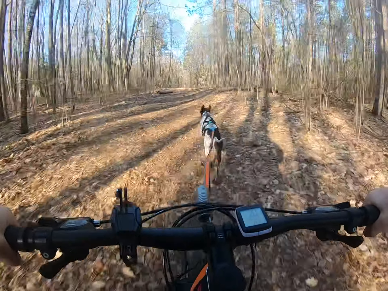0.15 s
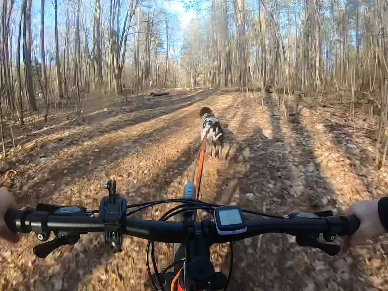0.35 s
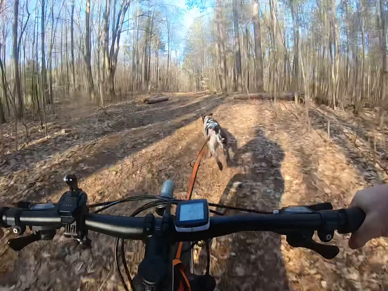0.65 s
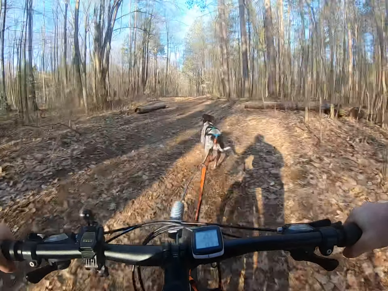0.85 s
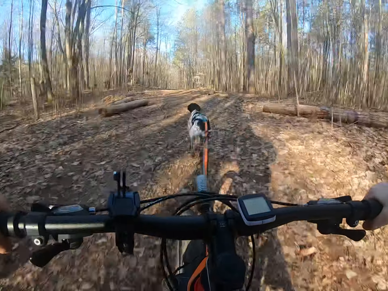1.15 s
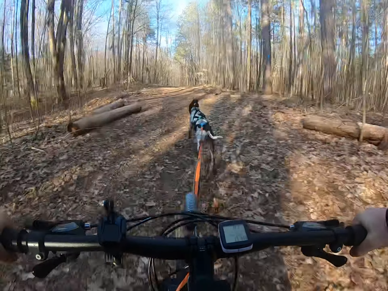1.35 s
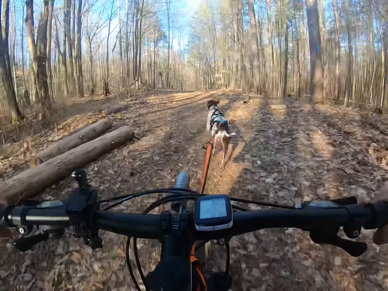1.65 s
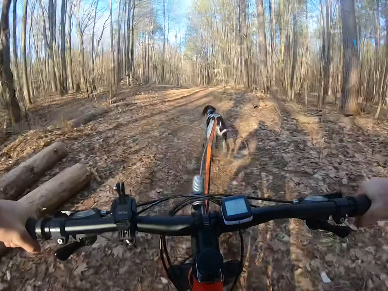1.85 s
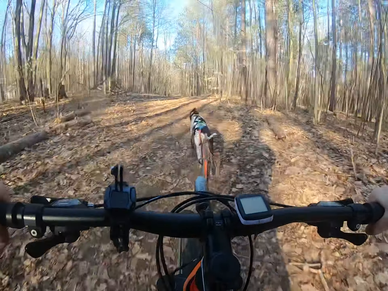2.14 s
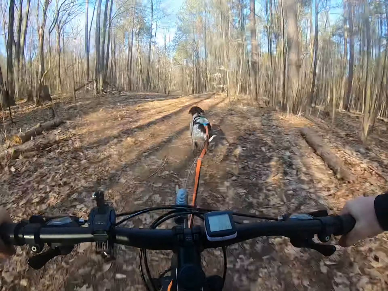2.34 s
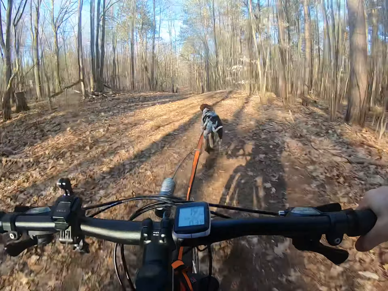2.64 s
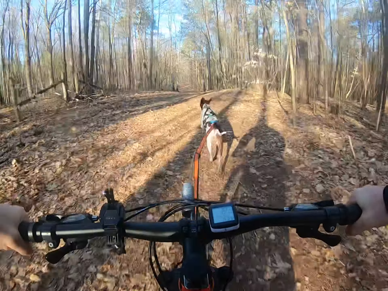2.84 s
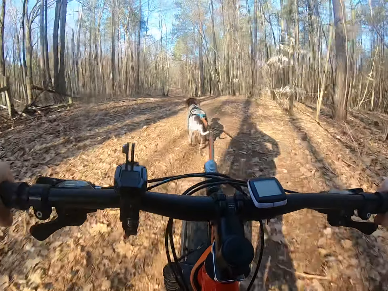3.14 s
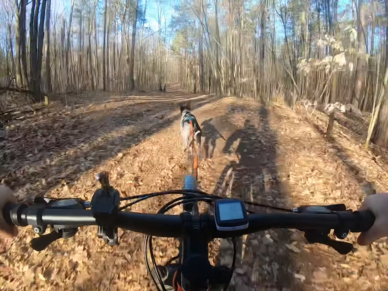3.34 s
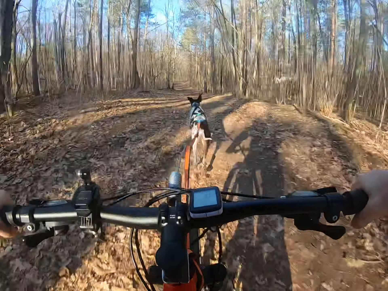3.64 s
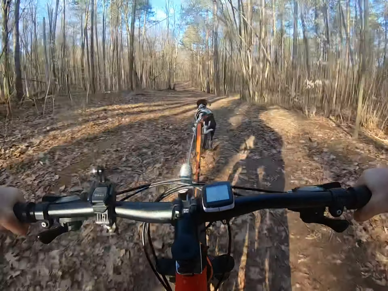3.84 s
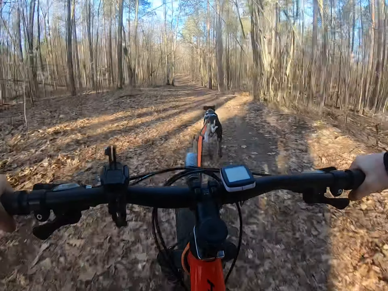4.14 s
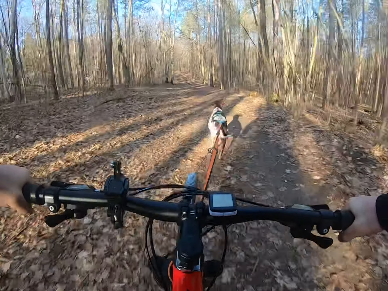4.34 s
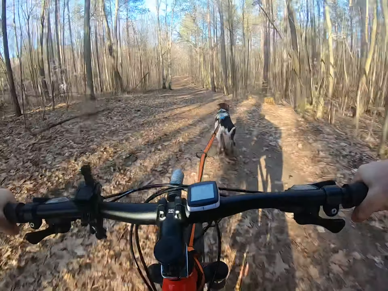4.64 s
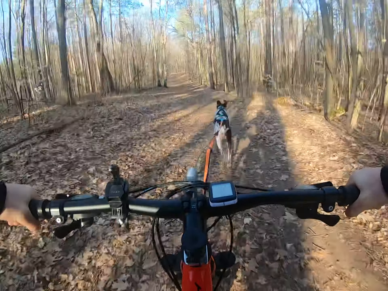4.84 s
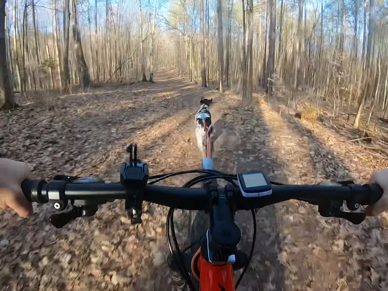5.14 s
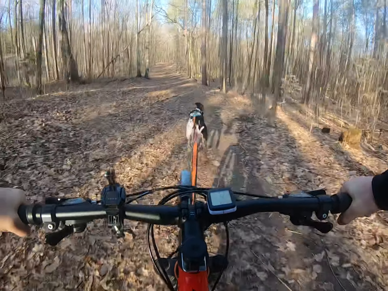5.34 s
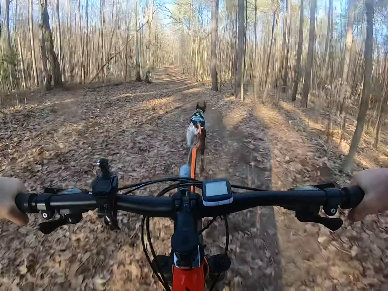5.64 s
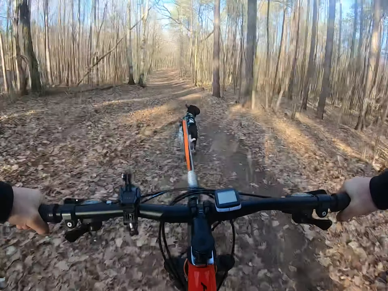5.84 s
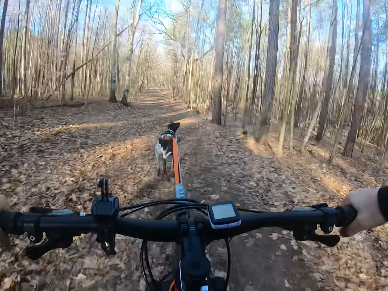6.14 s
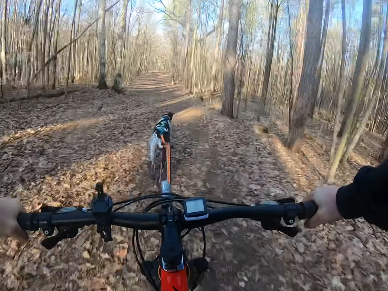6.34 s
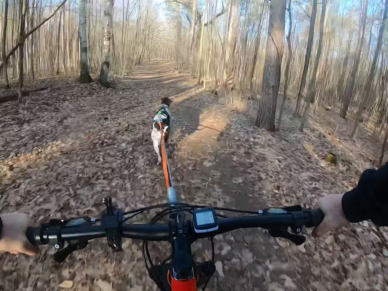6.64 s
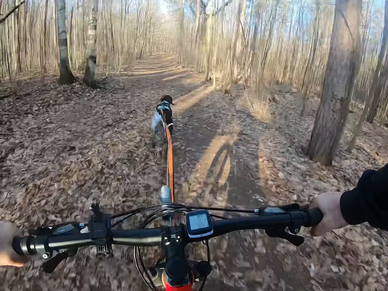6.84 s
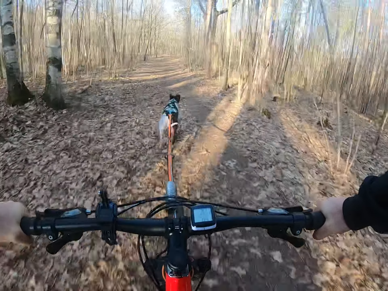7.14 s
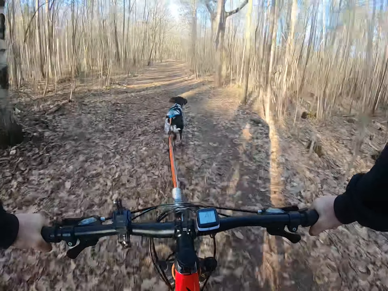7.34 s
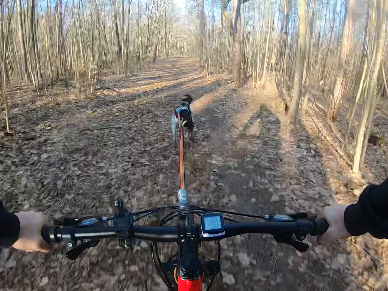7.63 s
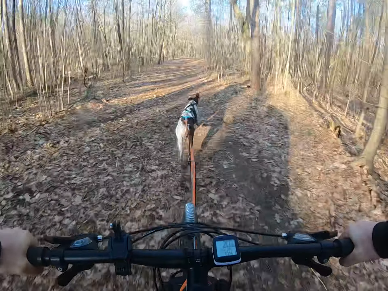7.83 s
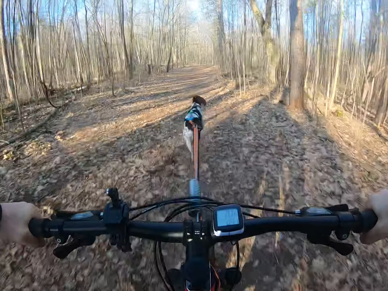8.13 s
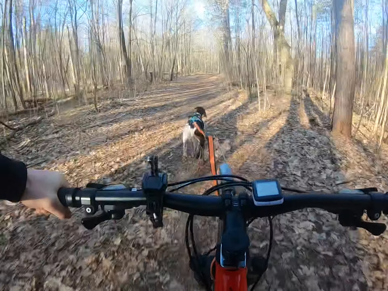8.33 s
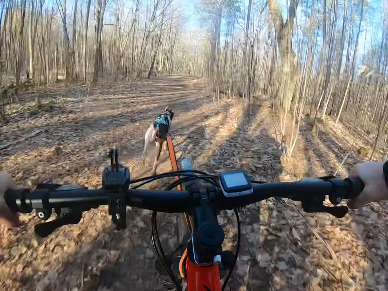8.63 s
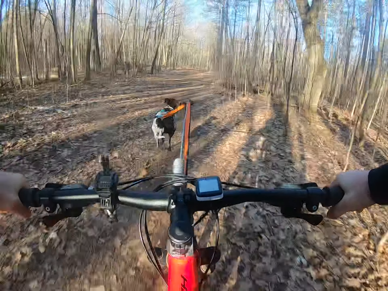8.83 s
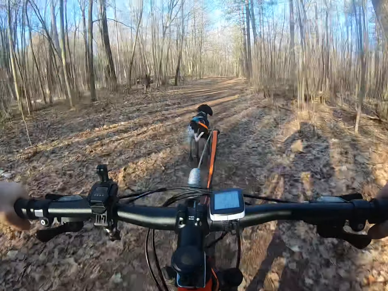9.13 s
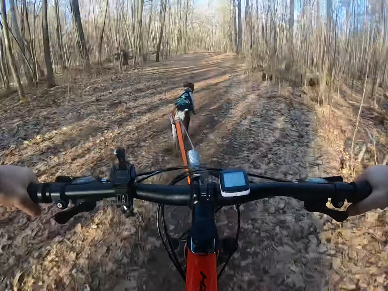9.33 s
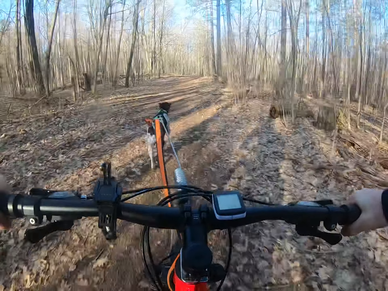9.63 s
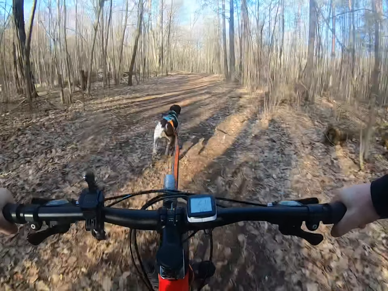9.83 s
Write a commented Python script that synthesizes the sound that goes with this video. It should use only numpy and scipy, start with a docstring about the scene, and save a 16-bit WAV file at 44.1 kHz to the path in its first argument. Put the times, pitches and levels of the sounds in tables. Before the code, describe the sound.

A mountain bike rolls steadily along a leafy forest trail, tyres crunching dry leaves over low rumble, with clicks and rattles increasing near the end.

```python
"""A leaf-covered forest trail, with a mountain bike rolling along it, heard from a camera on the rider.
Coloured noise makes the air rumble, frame drone and tyre hum; low damped tones make the jolts and root knocks.
The tyres crush dry leaves and grit: filtered showers of tiny fractures, with single crackles and scuffs on top.
Loose parts click and rattle as struck, damped modes, most of all over the rough ground near the end."""
import sys
import numpy as np
from scipy import signal
from scipy.fft import rfft, irfft, next_fast_len
from scipy.io import wavfile
from scipy.ndimage import uniform_filter1d

SR = 44100
rng = np.random.default_rng(int(sys.argv[2]) if len(sys.argv) > 2 else 0)


def digitize_waveform(pressure):
    """Quantize a signal to 16-bit integers and store it at the path in sys.argv[1].

    Rows of a 2-D input are taken as channels; values are limited to [-1, 1].
    """
    field = np.atleast_2d(pressure).T
    bounded = np.clip(field, -1, 1)
    quanta = np.round(bounded * 32767).astype(np.int16)
    wavfile.write(sys.argv[1], SR, quanta)


N = 440098
TIME = np.arange(N) / SR


def amp(db):
    """Amplitude factor of a level in dB."""
    return 10 ** (np.asarray(db) / 20)


def evened(x):
    """Scales each channel to unit RMS."""
    return x / np.sqrt(np.mean(x ** 2, axis=-1, keepdims=True) + 1e-20)


def unit_strike(x):
    """Scales a short sound to the energy of unit power over five milliseconds."""
    return x / np.sqrt(np.sum(x ** 2, axis=-1, keepdims=True) / (.005 * SR) + 1e-20)


def read(points, hz):
    """Reads a curve, straight lines on a log-frequency axis."""
    f, value = np.transpose(points)
    return np.interp(np.log(hz + 1), np.log(f + 1), value)


def add(mix, s, sound):
    """Lays a sound into the mix at s seconds, trimmed at the end."""
    part = mix[:, max(round(s * SR), 0):][:, :sound.shape[-1]]
    part += sound[..., :part.shape[-1]]


def colour(x, spectrum, size=2048):
    """Minimum-phase filter with the given spectrum: sharp attack, ringing afterwards."""
    log_gain = np.log(amp(read(spectrum, abs(np.fft.fftfreq(size, 1 / SR)))))
    taps = np.fft.ifft(np.exp(np.conj(signal.hilbert(log_gain)))).real[:size // 2]
    return signal.oaconvolve(x, taps[None], axes=1)[:, :x.shape[1]]


def resonate(x, hz, width_hz):
    """A resonance of gain 1 at its centre."""
    return signal.lfilter(*signal.iirpeak(hz, hz / width_hz, fs=SR), x)


def wander(rate_hz):
    """Random drift of unit RMS that changes at about the given rate."""
    steps = rng.standard_normal(8000)
    return evened(np.interp(TIME * 2 * rate_hz, np.arange(len(steps)), steps))


def crunch(per_s, spread_db, clump_db, clump_hz, wash):
    """Tiny fractures of uneven size, in clumps as each leaf gives way, over a wash of countless smaller ones."""
    happens = rng.random(N) < per_s / SR
    sizes = amp(spread_db * np.minimum(rng.exponential(1, N), 4)) * happens
    grains = evened(sizes * rng.choice([-1., 1.], (2, N)))
    return (grains + wash * rng.standard_normal((2, N))) * amp(clump_db * wander(clump_hz))


def flakes(low_hz, high_hz, per_s, sharpness, spread_db, count=24):
    """Overlapping tiny crackles, each ringing for a few cycles at the pitch of its own flake."""
    out = 0
    for hz in np.geomspace(low_hz, high_hz, count):
        left, size, right = rng.random((int(per_s * N / SR / count), 3)).T
        height = amp(spread_db * np.minimum(-np.log(1 - size), 3))
        breaks = np.zeros((2, N))
        breaks[0, (left * N).astype(int)] = height
        breaks[1, (right * N).astype(int)] = height
        out = out + resonate(breaks, hz, hz / sharpness)
    return evened(out) * np.sqrt(high_hz / (SR / 2))  # about as strong per Hz as white noise of unit power


def swells(rows, rise_s, fall_s):
    """Power over time of (start s, length s, dB) events that rise, hold and die away."""
    t, power = TIME[::50], 0
    for s, length, db in rows:
        rise = np.clip((t - s) / rise_s, 0, 1)
        fall = np.exp(-np.maximum(t - s - length, 0) / fall_s)
        power = power + (amp(db) * rise * fall) ** 2
    return np.interp(TIME, t, power)


# Roughness of the trail under the tyres. Each row: time in seconds, roughness in dB.
TRAIL = [(0, -8), (.8, -2), (1.15, -1.5), (1.35, -8), (1.6, -4), (1.9, -7.5), (2.4, -4.5), (3.15, -8),
         (3.5, -3.5), (3.85, 1.5), (4.25, -7), (5.0, -5.5), (5.5, -1), (6.2, 2.5), (6.65, 3), (7.3, 5.5),
         (8.1, -1), (8.8, 4.5), (9.3, 4), (9.8, 1)]
# Tyres pressing into humps and drifts of leaves. Each row: start in seconds, hold in seconds,
# then the push in dB for the leaves, for the soil and for the thud in the frame, before each layer's offset and trim.
BUMPS = [(0.0, 0.065, -56, -55, -39.5), (0.115, 0.048, -54, -53, -45), (0.237, 0.054, -48, -51, -47),
         (0.446, 0.097, -69, -50, -44), (0.587, 0.1, -47, -47.5, -40.5), (0.758, 0.021, -55, -40.5, -43),
         (0.805, 0.048, -53, -56, -42), (0.921, 0.061, -46, -46, -44), (1.043, 0.073, -47, -55, -54),
         (1.141, 0.081, -43.5, -42, -49), (1.543, 0.13, -48, -45, -45), (1.67, 0.13, -48, -48, -43.5),
         (1.832, 0.1, -46.5, -47.5, -42.5), (1.95, 0.038, -43, -46.5, -36), (2.03, 0.14, -45, -46.5, -43.5),
         (2.543, 0.078, -44.5, -48, -44), (2.62, 0.1, -44, -49, -43), (2.82, 0.044, -44.5, -48, -39.5),
         (3.038, 0.19, -45.5, -48.5, -48), (3.228, 0.12, -49, -56, -47), (3.552, 0.084, -46, -65, -60),
         (3.714, 0.076, -46.5, -55, -49), (3.804, 0.04, -48, -49, -52), (3.962, 0.021, -44, -50, -39),
         (4.118, 0.033, -51, -48, -52), (4.3, .04, -51, -54, -46), (4.586, 0.075, -46.5, -47, -43),
         (4.703, 0.079, -45, -46.5, -42), (4.82, 0.085, -46, -47, -42), (4.99, 0.096, -54, -60, -44.5),
         (5.114, 0.049, -43.5, -47, -44), (5.214, 0.024, -47, -45.5, -53), (5.366, 0.057, -64, -62, -54),
         (5.564, 0.05, -46, -45.5, -45), (5.84, 0.041, -45, -53, -45), (6.035, 0.087, -46, -43.5, -41),
         (6.48, 0.046, -62, -45.5, -45), (6.712, 0.12, -47.5, -49, -42.5), (6.83, 0.035, -46, -52, -52),
         (6.938, 0.086, -49, -53, -41), (7.075, 0.11, -45.5, -48, -37.5), (7.28, 0.17, -65, -67, -38.5),
         (7.426, 0.081, -51, -44.5, -39), (7.597, 0.14, -48.5, -48.5, -39), (7.724, 0.17, -48, -46.5, -38),
         (7.937, 0.032, -44, -51, -58), (8.115, 0.017, -56, -36, -49), (8.32, 0.081, -46, -42, -43),
         (8.604, 0.069, -47, -45.5, -56), (8.88, 0.033, -53, -56, -46), (9.07, 0.12, -44.5, -49, -39),
         (9.153, 0.17, -49, -52, -40), (9.31, 0.092, -44, -64, -61), (9.407, 0.066, -45, -47, -57),
         (9.54, 0.05, -41.5, -46, -37), (9.614, 0.022, -60, -62, -35), (9.933, 0.049, -52, -43, -36.5)]
LEAVES_COLUMN, SOIL_COLUMN, THUD_COLUMN = 2, 3, 4


def rolling_gain(law, column):
    """A layer follows the roughness of the trail and swells with one column of the bumps."""
    even_db, follow, bump_db = law
    steady = amp(even_db + follow * np.interp(TIME, *np.transpose(TRAIL)))
    pushes = [(row[0], row[1], row[column] + bump_db) for row in BUMPS]
    return np.sqrt(steady ** 2 + swells(pushes, rise_s=0.026, fall_s=0.017))


# Tone of the buffeting air. Each row: frequency in Hz, relative level in dB per Hz.
RUMBLE_SPECTRUM = [(5, -18), (15, -1.5), (25, 2), (40, -4), (65, -17), (100, -35), (250, -33.5),
                   (1000, -100)]
# The rider lurches and air buffets the camera. Each row: start in seconds, hold in seconds, level in dB.
LURCHES = [(.43, 0.056, -31), (.67, .2, -43.5), (.98, 0.074, -37), (1.17, 0.1, -34), (1.53, 0.089, -35),
           (1.72, 0.12, -31), (2.11, 0.051, -32), (2.29, 0.051, -34), (2.6, 0.19, -31.5), (3.09, 0.19, -39),
           (3.6, 0.048, -32.5), (3.77, 0.1, -37), (3.95, 0.22, -34), (4.31, 0.08, -31.5),
           (4.66, 0.037, -34), (5.0, 0.098, -33), (5.35, 0.21, -34.5), (5.73, 0.065, -30),
           (5.89, 0.15, -35.5), (6.41, 0.055, -31), (6.83, 0.15, -34.5), (7.13, 0.09, -31.5),
           (7.32, 0.16, -33), (7.63, 0.11, -31), (7.92, 0.4, -32), (8.48, 0.047, -30), (9.12, 0.095, -29.5),
           (9.36, 0.043, -30), (9.5, 0.14, -32.5)]


def buffeting():
    """Air rumbles at the microphone: deep noise, calm between lurches and swelling with each one."""
    rumble = evened(colour(rng.standard_normal((2, N)), RUMBLE_SPECTRUM, size=16384))
    rumble /= np.sqrt(uniform_filter1d(rumble ** 2, size=6000, axis=1) + 0.14)  # evens out its own surges
    calm = amp(-39.5 + 1 * wander(rate_hz=2.6))
    return rumble * np.sqrt(calm ** 2 + swells(LURCHES, rise_s=0.021, fall_s=0.015))


# Tone of the droning frame. Each row: frequency in Hz, relative level in dB per Hz.
DRONE_SPECTRUM = [(30, -36.5), (70, 4), (100, 0.5), (160, -1.5), (205, -5.5), (250, -16.5), (340, -19),
                  (460, -28), (900, -46.5), (3000, -110)]
# How the drone rides the trail: level at roughness 0 in dB before trim, dB per dB of roughness, bump offset in dB.
DRONE_LAW = (-45, 0.82, 0)


def frame_drone(trim_db=-2.0):
    """Bumps set the frame droning: low grainy noise that follows the trail."""
    grain = crunch(per_s=90, spread_db=2.5, clump_db=-0.5, clump_hz=29.05, wash=0.99)
    drone = evened(colour(grain, DRONE_SPECTRUM, size=8192))
    return amp(trim_db) * drone * rolling_gain(DRONE_LAW, THUD_COLUMN)


# Tone of the tyre hum. Each row: frequency in Hz, relative level in dB per Hz.
HUM_SPECTRUM = [(120, -27), (220, -7), (258, -4.5), (279, 1), (305, -7.5), (345, -16.5), (410, -18),
                (500, -20), (900, -38), (3000, -81)]
# How the hum rides the trail: level at roughness 0 in dB, dB per dB of roughness, bump offset in dB.
HUM_LAW = (-53.5, 0.37, -33)


def tyre_hum():
    """The knobbly tyres hum as they roll: grainy noise in a narrow low band."""
    grain = crunch(per_s=280, spread_db=4.0, clump_db=2.0, clump_hz=4.5, wash=1.08)
    return evened(colour(grain, HUM_SPECTRUM, size=8192)) * rolling_gain(HUM_LAW, THUD_COLUMN)


# Hard jolts taken by tyres and fork. Each row: start in seconds, level in dB before the attack, pitch in Hz.
JOLTS = [(.923, -37.5, 111), (1.752, -41, 46), (5.116, -31, 47.7), (5.358, -33, 74.4), (7.135, -39, 125),
         (7.622, -25, 49.7), (8.139, -29, 59), (9.116, -22, 42), (9.165, -19.5, 52.4), (9.627, -28, 45)]


def jolts(rise_s=0.005, t60=0.14):
    """The bike bounces on its tyres and fork: one low, damped tone for each thump."""
    out, t = np.zeros((2, N)), np.arange(SR // 4) / SR
    for s, db, hz in JOLTS:
        envelope = amp(db - 60 * t / t60) * (1 - np.exp(-t / rise_s))
        add(out, s, envelope * np.sin(2 * np.pi * hz * t))
    return out


# The frame, struck from below. Each row: mode in Hz, level in dB re the knock, t60 in seconds.
FRAME_MODES = [(292, -1.5, 0.074), (423, -4, 0.03), (790, -6, 0.022), (1400, -10, 0.016)]
# Roots knocking through the wheels. Each row: start in seconds, level in dB,
# hardness in dB per octave above the lowest mode.
ROOTS = [(1.8642, -30, 5), (2.66, -38, -9), (2.678, -28.5, -17), (2.721, -37, -18), (2.778, -42, -14)]


def roots():
    """A root gives the frame one compact knock; a hard one wakes the higher modes too."""
    out, t = np.zeros((2, N)), np.arange(SR // 5) / SR
    hz, mode_db, t60 = np.transpose(FRAME_MODES)[:, :, None]
    for s, db, hardness in ROOTS:
        strength_db = db + mode_db + hardness * np.log2(hz / hz[0])
        modes = amp(strength_db - 60 * t / t60) * np.sin(2 * np.pi * hz * t)
        add(out, s, modes.sum(0))
    return out


# Metal parts clinking. Each row: start in seconds, level in dB before each layer's offset,
# time to the rebound in seconds.
CLINKS = [(2.001, -35.5, 0.0039), (2.039, -29, 0.0046), (4.4688, -38.5, 0.0049), (7.316, -45.5, 0.005),
          (8.469, -32.5, 0.0027), (8.5276, -32, 0.0035), (9.121, -41, 0.0045), (9.2052, -37, 0.0018),
          (9.4234, -30, 0.0044)]
REBOUND_DB = -10.5  # re the first strike


def clink_strikes():
    """A clinking part strikes twice: (start s, dB) of every clink and its rebound."""
    first = [(s, db) for s, db, _ in CLINKS]
    return first + [(s + delay, db + REBOUND_DB) for s, db, delay in CLINKS]


def ring(modes, band_hz, t, force, detune=0.025):
    """Damped modes driven by the contact force, a little off pitch each time, kept to the part's band."""
    hz, db, t60 = np.transpose(modes)[:, :, None]
    hz = hz * (1 + detune * (2 * rng.random(hz.shape) - 1))
    wave = (amp(db - 60 * t / t60) * np.sin(2 * np.pi * hz * t)).sum(0)
    wave = signal.sosfilt(signal.butter(3, band_hz, "bandpass", fs=SR, output="sos"), wave)
    return unit_strike(signal.fftconvolve(force, wave[None], axes=1)[:, :len(t)])


# Ringing of the bike around a knock, then of a clinking part.
# Each row: nominal mode in Hz before detuning, relative level in dB, t60 in seconds.
KNOCK_MODES = [(910, -1, 0.009), (1700, -32, 0.0061), (1900, -3.5, 0.023), (2350, 5.5, 0.0054),
               (3130, -18, 0.019), (1720, -15, 0.084)]
CLINK_MODES = [(3020, -19, 0.00073), (3180, 28, 0.014), (3680, -17, 0.005)]
# Band in which each struck part radiates: low edge in Hz, high edge in Hz.
KNOCK_BAND = (1100, 4240)
CLINK_BAND = (2720, 4330)
# Dull knocks of loose parts. Each row: start in seconds, level in dB before trim, nominal pitch of the part in Hz,
# metallic edge in dB re that level, left minus right in dB.
KNOCKS = [(0.2166, -33, 2160, -11, -3), (0.779, -41.5, 1700, -20, 3), (1.6667, -31.5, 1850, -11, -3),
          (1.7268, -37, 2300, -5, -3), (3.1796, -34.5, 1900, -9, -3), (4.437, -36.5, 1970, -16, -1),
          (5.3052, -32.5, 1960, -18, -3), (5.346, -30, 2220, -12, -4), (5.647, -34, 1720, -12, -2),
          (6.2736, -33, 2100, -13, -2), (6.3103, -21, 2100, -8.5, -3), (6.8036, -32, 2200, -3, -5),
          (6.9975, -25.5, 1870, -15, -3), (7.2101, -28.5, 1580, -6, -6), (7.219, -35, 2100, -8, 5),
          (7.2625, -24.5, 2140, -13, 1), (7.279, -32, 2280, -4.5, -1), (8.2335, -23, 2200, -20, -1),
          (8.301, -33, 1890, -6, 2), (8.352, -32, 2400, -3.5, -2), (8.5286, -39, 2050, -14, -2),
          (8.8992, -35.5, 2200, -7, -1), (9.2052, -34.5, 2400, 2, -1), (9.2419, -25, 2240, -13, 0),
          (9.2569, -23, 2090, -24, -8), (9.2609, -22, 2100, -24, -1), (9.299, -23.5, 1910, -27, 0),
          (9.3085, -27, 2400, -5, 1), (9.361, -31, 1990, -6, -1), (9.388, -36, 1700, -5, 4),
          (9.411, -36, 2200, -14, 0), (9.428, -36, 1800, -2, -2), (9.4469, -38, 2300, -10, -3),
          (9.6212, -15, 2190, -32, 4.5), (9.638, -28.5, 2220, -17, -13)]


def rattles(knock_trim_db=-1.0, chatter=0.13, chatter_s=0.0033):
    """Each strike rings a dull part and a metallic one, which chatter briefly as they meet."""
    out, t = np.zeros((2, N)), np.arange(2400) / SR
    strikes = [(s, db, hz, db + edge, pan) for s, db, hz, edge, pan in KNOCKS]
    # a clink also strikes a dull part: 5 dB under it, at 2 kHz, 6 dB to the left
    strikes += [(s, db - 5, 2000, db, 6) for s, db in clink_strikes()]
    for s, knock_db, hz, clink_db, pan_db in strikes:
        force = (t == 0) + chatter * np.exp(-t / chatter_s) * rng.standard_normal((2, len(t)))
        own_note = (hz, 11.5, 0.0092)  # Hz, dB, t60 s
        dull = amp(knock_db + knock_trim_db) * ring([own_note] + list(KNOCK_MODES), KNOCK_BAND, t, force)
        metal = amp(clink_db) * ring(CLINK_MODES, CLINK_BAND, t, force)
        add(out, s, (dull + metal) * amp([[pan_db / 2], [-pan_db / 2]]))
    return out


# Tone of a hard contact, then of its bright tip. Each row: frequency in Hz, relative level in dB per Hz.
SNAP_SPECTRUM = [(800, -25), (2500, -10.5), (4200, -4), (5500, 2), (7000, -1), (8400, -1), (9500, -12.5),
                 (11000, -24), (14000, -55.5)]
TIP_SPECTRUM = [(5000, -27.5), (8500, 2.5), (9500, 1), (12500, -14.5), (14500, -19), (16500, -36)]
# Sharp ticks of grit and chain. Each row: start in seconds, level in dB, bright tip in dB re the tick before trim,
# first minus second channel in dB ahead of the ports.
TICKS = [(0.219, -41.5, -3, 0), (4.4368, -41, -25, -8), (5.3458, -50, -9, 0), (5.169, -40, -6, 0),
         (5.2036, -32, -2.5, -6), (5.8366, -31, -1.5, -7), (5.8765, -40, -3, 1), (6.2733, -32.5, -0.5, -4),
         (6.311, -34, -4, -1), (6.753, -37.5, -9, -4), (6.818, -43, -8, -3), (6.881, -42, -1.5, 2),
         (7.2101, -27.5, -5, -5), (7.2132, -31, 0, -4), (7.2185, -46, -12, -3), (7.2625, -41, -2, 0),
         (7.2655, -37, -3, 0), (7.279, -34.5, -7, -1), (7.3614, -41.5, -2.5, -6), (7.533, -39, -6, 4),
         (7.913, -41, -5, 1), (8.041, -39, -1.5, 0), (8.2338, -37, -9, -1), (8.3008, -36, -18, -11),
         (8.3524, -38, -24, -4), (8.528, -37, -22, -8), (9.0456, -37, -5, -2), (9.093, -39, -4, -5),
         (9.205, -44, 3, 0), (9.246, -28.5, -6, -6), (9.2608, -33, -8, -4), (9.2634, -30.5, -8, -5),
         (9.3088, -32.5, -0.5, -3), (9.3171, -33.5, 1, -2), (9.3434, -44, -15, -3), (9.3565, -41, -8, 0),
         (9.361, -33.5, -4, 5), (9.388, -35, -7, 2), (9.4012, -41, -14, 0), (9.4116, -37, -4, -2),
         (9.4234, -36, -8, -8), (9.4463, -33.5, -4, -13), (9.566, -41, -17, -2), (9.5835, -34.5, -2, -8),
         (9.6381, -32, -6, 3), (9.7074, -33.5, -6, -6), (9.8377, -44.5, -4, 1), (9.931, -34.5, -6, -6)]
# Rough ground flings grit against the bike. Each row: start in seconds, length in seconds,
# level of a grain in dB before its random size.
SPRAYS = [(7.197, 0.11, -43), (9.25, 0.2, -46)]


def snaps(tip_trim_db=-1.5, crack_s=0.0011, tail_s=0.01, tail=0.08, first_touch=2.8, grit_per_s=55):
    """The hard contact of each tick, clink and flung grain: one sharp spike, then a short scatter off the bike."""
    out, t = np.zeros((2, N)), np.arange(1200) / SR
    scatter = np.exp(-t / crack_s) + tail * np.exp(-t / tail_s)
    contacts = list(TICKS) + [(s, db + 1.5, -23, -5) for s, db in clink_strikes()]
    for s, length, db in SPRAYS:
        for when, size in rng.random((int(grit_per_s * length), 2)):
            contacts.append((s + length * when, db + 10 * np.log10(.5 + size), -6, 0))
    for s, snap_db, tip_db, pan_db in contacts:
        crack = first_touch * (t == 0) + scatter * rng.standard_normal((2, len(t)))
        sides = evened(amp([pan_db / 2, -pan_db / 2]))[:, None]
        snap = unit_strike(colour(crack, SNAP_SPECTRUM, size=512))
        tip = unit_strike(colour(crack, TIP_SPECTRUM, size=512))
        add(out, s, sides * amp(snap_db) * snap)
        add(out, s, sides * amp(snap_db + tip_db + tip_trim_db) * tip)
    return out


# Tyres scuffing over sticks and roots. Each row: start in seconds, level in dB before the attack,
# centre in Hz, width in Hz of each of two filter passes, t60 in seconds.
SCUFFS = [(1.186, -42, 1570, 1520, 0.59), (1.721, -41.5, 6060, 6000, 0.11), (1.856, -29, 1240, 1700, 0.07),
          (2.045, -32, 1090, 1100, 0.069), (2.656, -42.5, 370, 260, 0.2), (2.668, -41.5, 5470, 6000, 0.18),
          (3.526, -32, 1070, 700, 0.035), (8.134, -32.5, 1250, 1390, 0.094),
          (8.356, -32.5, 1400, 1500, 0.11)]


def scuffs(rise_s=0.0011, top_hz=8000):
    """A tyre meets something hard: a rough, damped burst of noise around one pitch."""
    out, t = np.zeros((2, N)), np.arange(SR // 3) / SR
    for s, db, hz, width_hz, t60 in SCUFFS:
        noise = rng.standard_normal((2, len(t)))
        grind = evened(resonate(resonate(noise, hz, width_hz), hz, width_hz))
        add(out, s, grind * amp(db - 60 * t / t60) * (1 - np.exp(-t / rise_s)))
    return signal.sosfilt(signal.butter(6, top_hz, fs=SR, output="sos"), out)


# Tone of the crackling leaves, then of their fizzing edges. Each row: frequency in Hz, relative level in dB per Hz.
LEAVES_SPECTRUM = [(500, -29), (1200, -1), (1600, 1), (1900, 3), (2400, 1.5), (2850, -5), (3200, -7),
                   (3550, -8), (3900, -19), (4500, -18.5), (9000, -45), (16000, -67)]
FIZZ_SPECTRUM = [(2000, -28.5), (3800, 6), (4400, -0.5), (5000, 3), (5600, 3), (6800, 1), (7800, -2.5),
                 (8800, -2.5), (10000, -10.5), (12500, -22), (14000, -26), (16000, -73)]
# How the leaves ride the trail: level at roughness 0 in dB before trim, dB per dB of roughness, bump offset in dB.
LEAVES_LAW = (-47, 0.35, 0)
# Single dry leaves and twigs giving way. Each row: start in seconds, level in dB before trim, pitch in Hz.
CRACKLES = [(0.326, -39.5, 2110), (0.957, -37, 2300), (1.214, -39, 2300), (1.433, -41.5, 2920),
            (1.802, -44, 2000), (1.849, -39, 1800), (2.343, -42, 2000), (2.54, -38, 2700),
            (2.858, -40, 2000), (2.979, -45, 1500), (3.114, -42, 1700), (3.161, -39.5, 1600),
            (3.219, -42, 2300), (3.3, -40, 1700), (3.786, -39, 2100), (3.907, -37.5, 2200),
            (4.551, -42.5, 2220), (4.621, -40, 2000), (5.192, -36.5, 2030), (5.472, -37.5, 2800),
            (5.558, -37.5, 2110), (5.607, -47, 1400), (5.713, -40.5, 2600), (5.9, -38.5, 2510),
            (6.364, -44, 2800), (6.51, -43, 2100), (6.817, -36, 2200), (7.105, -36, 2700),
            (7.121, -41, 1600), (7.236, -37, 2200), (7.248, -44, 2200), (7.293, -40, 2300),
            (7.78, -39, 2000), (7.855, -38, 2200), (8.083, -45, 2700), (8.249, -38, 2100),
            (8.27, -50, 3300), (8.737, -37, 2100), (8.909, -39, 2000), (9.268, -42, 2100),
            (9.286, -37, 2100), (9.328, -42, 2300), (9.665, -43, 2300), (9.772, -36.5, 2900),
            (9.85, -42, 3120)]


def crackles(per_s=32, small_db=-48.0, spread_db=1.2, decay_s=0.0043, edge_db=-15, leaf_hz=2000,
             octaves=1.0, width_hz=1300, loud_trim_db=1.0):
    """A leaf gives way in uneven fractures around its own pitch, its edge fizzing; small ones fall at random."""
    out, t = np.zeros((2, N)), np.arange(1000) / SR
    when, size, stiffness = rng.random((int(per_s * N / SR), 3)).T
    when = when * N / SR
    ground_db = LEAVES_LAW[1] * np.interp(when, *np.transpose(TRAIL))
    level_db = small_db + ground_db + spread_db * np.minimum(-np.log(1 - size), 3)
    pitch_hz = leaf_hz * 2 ** (octaves * (2 * stiffness - 1))
    large = [(s, db + loud_trim_db, hz) for s, db, hz in CRACKLES]
    for s, db, hz in large + list(zip(when, level_db, pitch_hz)):
        fractures = np.exp(-t / decay_s) * rng.standard_normal((2, len(t))) ** 3  # cubing makes them uneven
        body = unit_strike(resonate(colour(fractures, LEAVES_SPECTRUM, size=512), hz, width_hz))
        edge = unit_strike(colour(fractures, FIZZ_SPECTRUM, size=512))
        add(out, s, amp(db) * (body + amp(edge_db) * edge))
    return out


# Tone of the crunching soil. Each row: frequency in Hz, relative level in dB per Hz.
SOIL_SPECTRUM = [(150, -41.5), (350, -2), (460, -7), (600, -2), (700, -0.5), (880, 7), (1100, 0.5),
                 (1300, -12), (1800, -5), (2800, -30), (5000, -65), (12000, -64)]
# How soil and fizz ride the trail: level at roughness 0 in dB before trim, dB per dB of roughness, bump offset in dB.
SOIL_LAW = (-49.5, 0.64, 0)
FIZZ_LAW = (-60, 0.3, -19.5)


def tyres(soil_trim_db=2, leaves_trim_db=1, fizz_trim_db=3.5, load_db=1.28, patch_db=0.7,
          soil_grain=0.9, leaf_grain=1.58):
    """Soil crunches in patches, leaves crackle and their edges fizz under a jittering tyre load."""
    load = amp(load_db * wander(rate_hz=22))
    patches = amp(patch_db * wander(rate_hz=14))
    soil = evened(crunch(per_s=450, spread_db=1.0, clump_db=1.0, clump_hz=43.6, wash=0.8))
    soil = soil + soil_grain * flakes(296, 2020, per_s=1500, sharpness=10, spread_db=2.0)
    soil = evened(colour(soil * patches, SOIL_SPECTRUM))
    leaves = crunch(per_s=600, spread_db=1.0, clump_db=0.6, clump_hz=69.4, wash=0.98)
    # the edges share some of the leaves' own fractures
    edges = crunch(per_s=1500, spread_db=2.5, clump_db=2.0, clump_hz=83.0, wash=1.0) + 0.31 * leaves
    fizz = evened(colour(edges, FIZZ_SPECTRUM))
    leaves = evened(leaves) + leaf_grain * flakes(915, 4450, per_s=1700, sharpness=15.7, spread_db=2.5)
    leaves = evened(colour(leaves, LEAVES_SPECTRUM))
    return load * (amp(soil_trim_db) * soil * rolling_gain(SOIL_LAW, SOIL_COLUMN)
                   + amp(leaves_trim_db) * leaves * rolling_gain(LEAVES_LAW, LEAVES_COLUMN)
                   + amp(fizz_trim_db) * fizz * rolling_gain(FIZZ_LAW, LEAVES_COLUMN))


# Resonances of the bike. Each row: centre in Hz, width in Hz, level in dB of the resonance added to the sound.
BIKE_MODES = [(587, 54, -7), (1955, 20, -4.5), (3037, 21, 0), (3815, 21, 3.5), (4140, 56, 0.5),
              (5680, 230, 0.5), (7710, 46, 7)]


def bike_body(rolling):
    """The bike's resonances colour the rolling sound, ringing in parallel with it."""
    return rolling + sum(amp(db) * resonate(rolling, hz, width_hz) for hz, width_hz, db in BIKE_MODES)


# How alike the two ports hear. Each row: frequency in Hz, likeness from 0 to 1.
LIKENESS = [(60, .97), (230, .97), (350, .88), (500, .72), (1000, .72), (1300, .5), (1800, .78),
            (2600, .68), (4500, .68), (8000, .55), (10000, .25)]
# Phase between the ports. Each row: frequency in Hz, lead of the left in radians.
PHASE_LEAD = [(330, 0), (480, -1), (720, -2.4), (1100, -2.9), (1300, -1.3), (1500, .6), (1900, -.4),
              (2900, -.6), (3400, 2), (4200, .7), (5300, 3.4), (6800, 3.3), (8000, 5.6)]
# Colour between the ports. Each row: frequency in Hz, left minus right in dB.
PORT_BALANCE = [(60, -2), (300, -0.5), (470, -0.5), (620, 3), (800, 1), (1150, -9), (1450, -1), (1950, 0.5),
                (2500, -4.5), (3200, -6), (4000, 3), (4600, -3), (6500, -3), (10000, 0.5)]


def ports(pair):
    """Two ports on different faces of the camera share part of the sound, with their own phase and colour."""
    size = next_fast_len(pair.shape[1] + 4096)
    hz = np.fft.rfftfreq(size, 1 / SR)
    direct, diffuse = rfft(pair, size, axis=1)
    same = np.clip(read(LIKENESS, hz), 0, 1)
    tilt_db = read(PORT_BALANCE, hz) / 2
    right = same * direct + np.sqrt(1 - same ** 2) * diffuse
    right = right * np.exp(-1j * read(PHASE_LEAD, hz))
    both = np.array([direct * amp(tilt_db), right * amp(-tilt_db)])
    return irfft(both, size, axis=1)[:, :pair.shape[1]]


def scene():
    """All the sounds of the ride, at the camera; the rattles bring their own left-right balance."""
    background = buffeting() + frame_drone() + tyre_hum() + jolts() + roots()
    rolling = background + scuffs() + crackles() + tyres()
    return ports(bike_body(rolling) + snaps()) + rattles()


def record(dry, edge_hz=16500):
    """The recorder's band limit: a steep low-pass at the top of the treble."""
    taps = signal.firwin(511, edge_hz, window=("kaiser", 9), fs=SR)
    return signal.oaconvolve(dry, taps[None], "same")


dry = scene()
out = record(dry)
digitize_waveform(out)
```